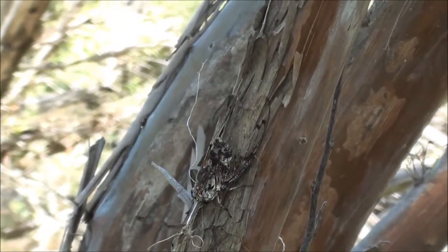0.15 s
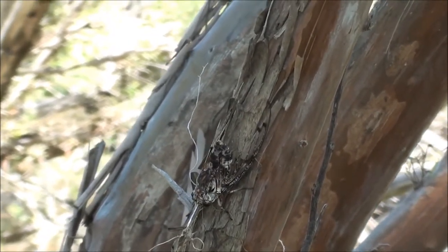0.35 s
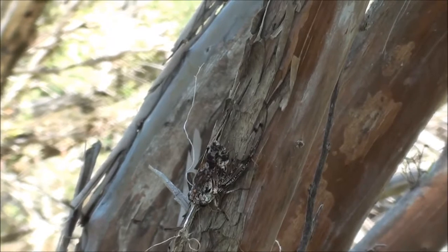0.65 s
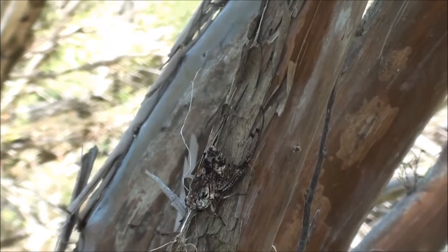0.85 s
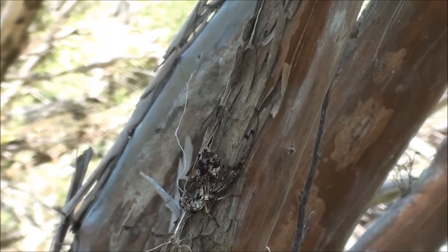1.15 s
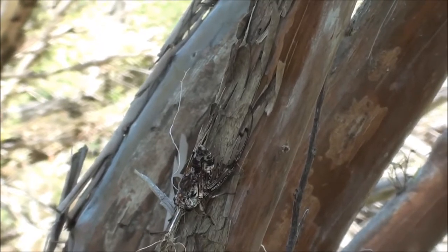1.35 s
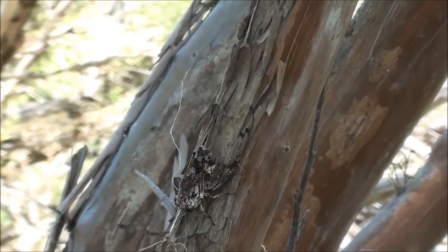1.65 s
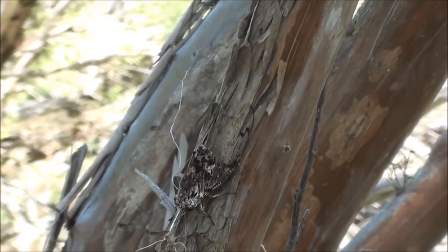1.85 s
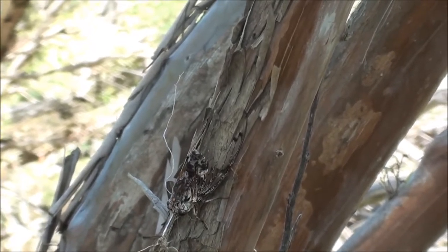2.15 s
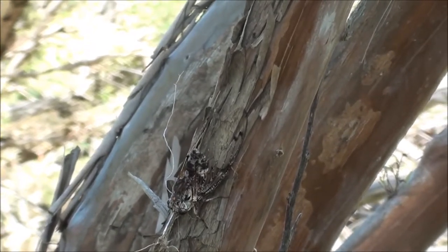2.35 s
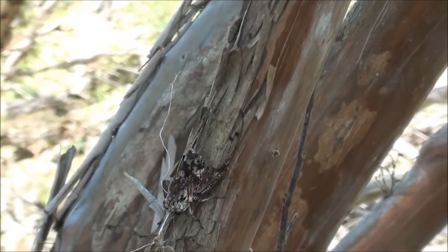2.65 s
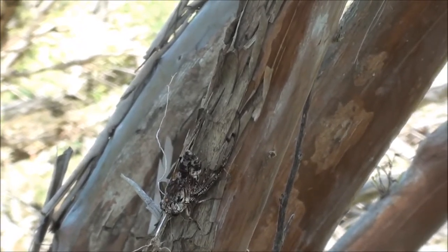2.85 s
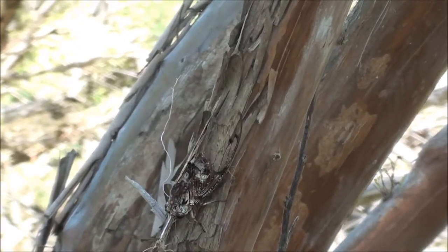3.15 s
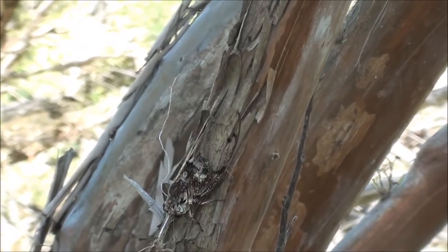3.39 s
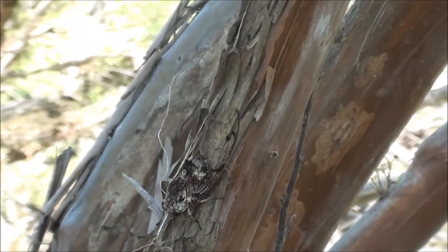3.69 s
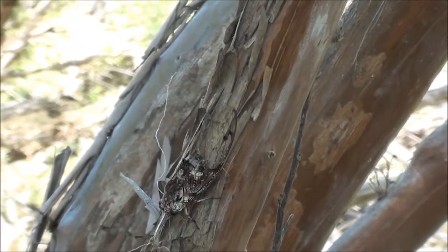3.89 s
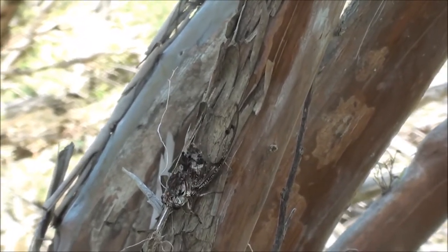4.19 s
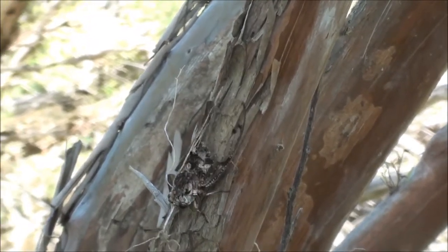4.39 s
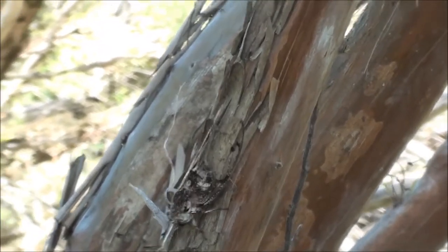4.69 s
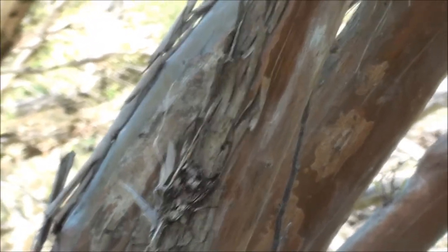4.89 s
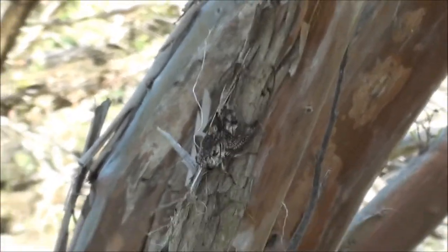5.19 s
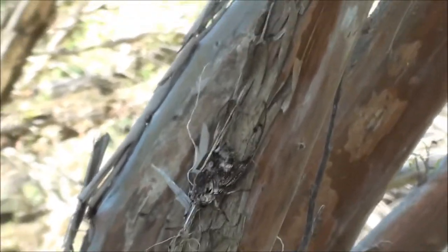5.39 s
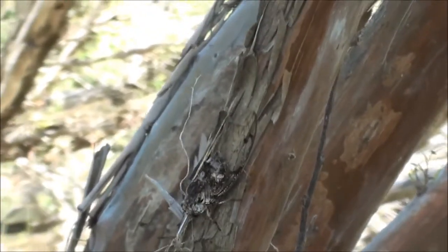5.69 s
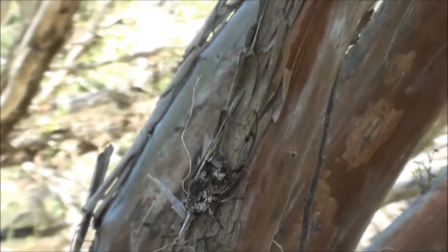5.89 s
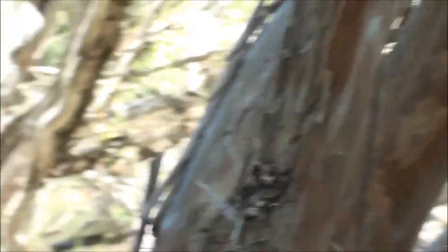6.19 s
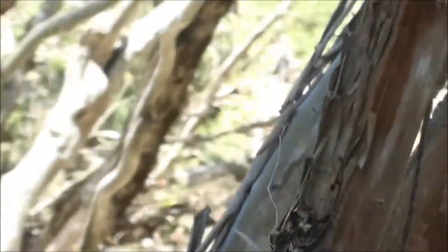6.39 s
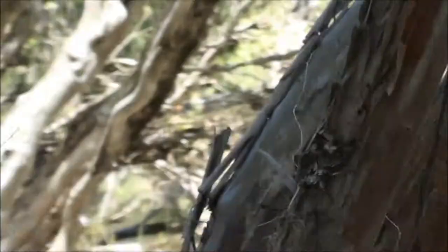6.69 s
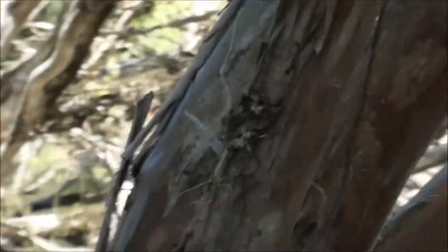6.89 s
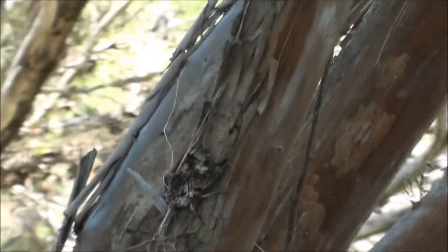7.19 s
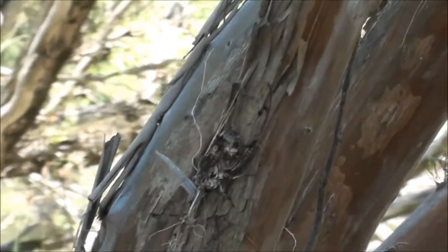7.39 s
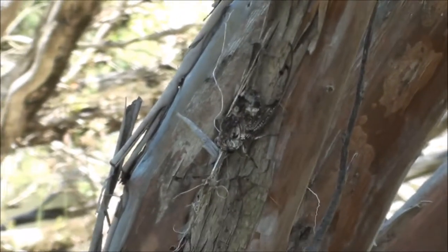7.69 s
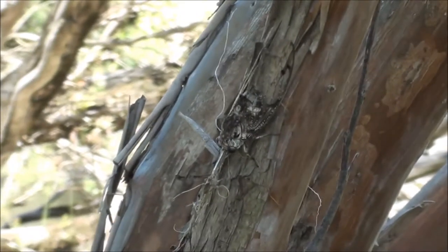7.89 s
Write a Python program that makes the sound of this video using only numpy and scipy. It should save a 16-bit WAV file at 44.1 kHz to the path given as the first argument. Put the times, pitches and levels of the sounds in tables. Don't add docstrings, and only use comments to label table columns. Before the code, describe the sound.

Loud, bright cicada song at close range: steady fast pulsing, a gap, then swelling bursts, with other cicadas, faint birds and leaves behind.

```python
import sys
import numpy as np
from scipy import signal
from scipy.fft import rfft, irfft, next_fast_len
from scipy.io import wavfile
from scipy.ndimage import uniform_filter1d, minimum_filter1d

SR = 44100
rng = np.random.default_rng(int(sys.argv[2]) if len(sys.argv) > 2 else 0)


def voltage_ratio(level):
    return 10 ** (np.asarray(level, float) / 20)


def bounce(signal):
    frames = np.transpose(np.atleast_2d(signal))
    limited = np.clip(frames, -1, 1)
    pcm = np.round(limited * 32767).astype(np.int16)
    wavfile.write(sys.argv[1], SR, pcm)


N = 355005
EARS = np.array([[1], [-1]])

# start_s, merge_s (bursts run together), end_s, first_step (of the
# ladder of strokes), level_db (of the first burst)
PHRASES = [
    (5.0126, 5.224, 5.33, 1, -13),
    (5.9562, 6.09, 6.196, 1, -12.3),
    (6.697, 6.9748, 7.0984, 0, -14.9),
    (7.5578, 7.7995, 7.9136, 0, -16),
]


def curve(table):
    return np.interp(np.arange(N) / SR, *np.transpose(table))


def band(x, lo_hz, hi_hz, order=2):
    return signal.sosfilt(signal.butter(order, [lo_hz, hi_hz], "bandpass", fs=SR, output="sos"), x)


def unit(x):
    return x / np.sqrt(np.mean(x ** 2))


def walk(rate_hz):
    hold = int(SR / rate_hz)
    steps = np.repeat(rng.standard_normal(N // hold + 1), hold)
    smooth = uniform_filter1d(uniform_filter1d(steps, hold), hold)
    return unit(smooth[:N])


def rings(s, hz, ring_s, gain, size=160):
    keep = (gain > 0) & (s > 0) & (s < (N - size - 1) / SR)
    s, hz, ring_s, gain = (v[keep][:, None] for v in (s, hz, ring_s, gain))
    at = np.ceil(s * SR).astype(int) + np.arange(size)
    age = at / SR - s
    envelope = (age / ring_s) ** 2 * np.exp(2 - 2 * age / ring_s)
    wave = gain * envelope * np.sin(2 * np.pi * hz * age)
    return np.bincount(at.ravel(), wave.ravel(), N)


def colour(x, table, pitch):
    hz, db = np.transpose(table)
    size = next_fast_len(N)
    bins_hz = np.arange(size // 2 + 1) * SR / size
    gain = voltage_ratio(np.interp(np.log(bins_hz + 1), np.log(hz * pitch), db))
    return irfft(rfft(x, size) * gain, size)[:N]


def echoes(x, t60_s, sparse=0.95):
    age = np.arange(int(.3 * SR)) / SR
    spots = rng.standard_normal((2, len(age))) * np.exp(sparse * rng.standard_normal((2, len(age))))
    tail = spots * np.exp(-np.log(1000) * age / t60_s) * (age > .003)
    tail = tail + .5 * tail[::-1]
    tail = tail / np.sqrt(np.sum(tail ** 2) / 2)
    return signal.fftconvolve(x[None], tail, axes=1)[:, :N]


def rumble():
    return voltage_ratio(-73.5) * unit(band(rng.standard_normal(N), 45, 184))


def breeze():
    # start_s, level_db
    breeze_levels = [(0, -53.5), (3.0, -54.5), (3.1, -57.5), (3.45, -56), (3.83, -53), (4.0, -52.5),
                     (4.42, -55.5), (4.55, -52.5), (5.0, -51.5), (5.6, -52.5), (5.8, -50), (6.2, -52.5),
                     (6.7, -50), (6.9, -50), (7.2, -54), (7.5, -52), (7.7, -50), (8.05, -54)]
    # pitch_hz, level_db
    leaf_spectrum = [(30, -48), (60, -47), (110, -29.5), (200, -12.5), (420, -17), (750, -12.5),
                     (1500, -15.5), (3000, -20), (5000, -20.5), (9000, -19), (12000, -29), (16000, -31)]
    out, swell = 0, walk(1.34)
    f, db = np.transpose(leaf_spectrum)
    for hz in 30 * 2 ** np.arange(0, 9.1, .5):
        grain = np.exp(0.12 * walk(60))
        mid, side = (unit(band(grain * rng.standard_normal(N), hz / 1.154, hz * 1.222)) for _ in range(2))
        level_db = np.interp(np.log(hz), np.log(f), db) + 10 * np.log10(hz)
        level_db = level_db + 0.69 * swell + 0.31 * walk(8.2)
        apart = 0.2 * min(hz / 350, 1) ** 2.1 * (1 + 0.24 * (700 < hz < 6000))
        out = out + voltage_ratio(level_db) * voltage_ratio(0.69 * EARS) * (mid + apart * side * EARS)
    return voltage_ratio(curve(breeze_levels)) * out / np.std(band(out[0], 176, 960, order=4))


def grip():
    # start_s, level_db (peak), pitch_hz, treble_db
    grip_ticks = [
        (4.777, -35, 1080, -37),
        (4.867, -42, 770, -41),
        (5.016, -35, 696, -33),
        (5.761, -40, 315, -23.5),
        (5.779, -37, 852, -30),
        (6.044, -32, 405, -35),
        (6.654, -33, 523, -49),
        (6.699, -36, 600, -50),
        (6.809, -39, 682, -35),
        (6.898, -33, 566, -33),
    ]
    out = np.zeros(N)
    age = np.arange(int(.02 * SR)) / SR
    for s, db, hz, treble_db in grip_ticks:
        noise = rng.standard_normal((2, len(age)))
        thud = np.sin(2 * np.pi * hz * age) + 2.3 * band(noise[0], 300, 1200)
        ring = voltage_ratio(db) * thud * np.exp(-age / 0.0034)
        scratch = voltage_ratio(treble_db) * band(noise[1], 1800, 9000) * np.exp(-age / 0.007)
        start = int(s * SR)
        out[start:start + len(age)] += band(ring, 200, 5000) + scratch
    return out


def birds():
    # start_s, length_ms, from_hz, to_hz, level_db
    song_notes = [(0.006, 24, 3040, 2630, -51.5), (0.108, 35, 4400, 3200, -50.5),
                  (0.255, 48, 2220, 2600, -58), (0.383, 22, 4620, 2840, -49.5),
                  (0.527, 34, 2400, 2510, -59), (0.646, 43, 3120, 2280, -54), (0.791, 50, 3030, 2350, -56),
                  (0.945, 34, 3480, 2580, -58), (0.98, 20, 2380, 2270, -60), (1.105, 22, 3500, 2530, -54),
                  (1.135, 29, 2230, 1880, -61)]
    # before_s (ahead of the last note), length_ms, from_hz, to_hz, level_db
    trill_notes = [
        (0, 12, 2660, 2630, -2.5),
        (0.0226, 10, 2660, 2720, -5.5),
        (0.047, 12, 2650, 2760, -8),
        (.072, 7.3, 2340, 2525, 1),
    ]
    # last_note_s, notes (count), level_db
    trill_times = [(4.70, 4, -50), (4.932, 4, -50.5), (5.138, 2, -53), (5.364, 3, -54), (7.284, 3, -50.5),
                   (7.53, 4, -53), (7.757, 3, -52), (8.01, 3, -51)]
    notes = list(song_notes)
    for s, count, db in trill_times:
        for before_s, ms, from_hz, to_hz, relative_db in trill_notes[:round(count)]:
            notes.append((s - before_s, ms, from_hz, to_hz, db + relative_db))
    out = np.zeros(N)
    for s, ms, from_hz, to_hz, db in notes:
        u = np.arange(int(ms * SR / 1000)) / (ms * SR / 1000)
        hz = from_hz + (to_hz - from_hz) * (1 - np.exp(-1.6 * u)) / (1 - np.exp(-1.6))
        envelope = np.sqrt(np.sin(np.pi * u)) * np.exp(-1.0 * u)
        i = int(s * SR)
        out[i:i + len(u)] += voltage_ratio(db + 12.5) * envelope * np.sin(2 * np.pi * np.cumsum(hz) / SR)
    return voltage_ratio(1.0 * EARS) * out + voltage_ratio(-4) * echoes(out, 0.26, sparse=1.0)


def chorus_db():
    # start_s, level_db
    chorus_levels = [(0, -30), (3.0, -32.5), (3.1, -25.5), (3.9, -24.5), (4.05, -21), (4.3, -29.5),
                     (4.5, -26.5), (4.95, -24), (5.3, -28), (5.4, -30), (5.75, -28.5), (5.92, -24.5),
                     (6.2, -36.5), (6.65, -32.5), (7.12, -38), (7.3, -30.5), (7.5, -32.5), (8.05, -36.5)]
    under_db, top_db = -13, -20.5
    levels = [curve(chorus_levels)]
    for s, merge, end, step, db in PHRASES:
        levels.append(curve([(s - .03, -70), (s, db + under_db), (merge - .06, top_db),
                             (merge + 0.065, top_db), (end - .02, -70)]))
    return np.max(levels, axis=0)


def chorus():
    # start_s, level_db
    neighbour_share = [(0, -12), (3.5, -12), (3.75, -4), (4.5, -5), (4.65, -1), (5.1, -1), (5.4, -12),
                       (7.1, -10), (7.2, -4), (7.35, -10), (8.05, -9)]
    start_s, period_s, burst_ms = 0.052, 0.037, 27
    starts = np.arange(start_s, N / SR, period_s)
    near = unit(cicada([(s, burst_ms, -10) for s in starts], pitch=1.0, snap_db=-28))
    near = voltage_ratio(1.2 * EARS) * near + voltage_ratio(-1.5) * echoes(near, 0.044)
    far = 0
    for far_period_s, pitch in [(.036, 1.14), (.039, 0.908), (.0415, 1.05)]:
        one = unit(cicada([(s, 31, -10) for s in np.arange(.01, N / SR, far_period_s)], pitch=pitch))
        drift = voltage_ratio(-6 + 0.18 * walk(7.04))
        far = far + drift * (voltage_ratio(-11) * one + echoes(one, 0.17, sparse=1.0))
    far = band(far, 4170, 9000, order=2)
    share = np.clip(voltage_ratio(curve(neighbour_share)), 0, .98)
    return voltage_ratio(chorus_db()) * (share * near + np.sqrt(1 - share ** 2) * unit(far))


def rival():
    # start_s, level_db
    rival_levels = [
        (0, -61),
        (3.15, -80),
        (3.25, -28.5),
        (3.36, -20),
        (3.43, -22),
        (3.48, -34),
        (3.5, -70),
        (8.05, -70),
    ]
    x = unit(cicada([(3.1, 426, -10)], pitch=0.98, snap_db=-26)) * 0.17
    return voltage_ratio(curve(rival_levels)) * (voltage_ratio(.8 * EARS) * x + voltage_ratio(-3.5) * echoes(x, 0.032, sparse=0.93))


def duck(bursts):
    depth_db, window_s = -5.5, 0.05
    from_share, over_share = 0.527, 0.061
    busy = np.zeros(N)
    for s, ms, db in bursts:
        busy[max(int(s * SR), 0):int((s + ms / 1000) * SR)] = 1
    size = int(window_s * SR)
    filled = uniform_filter1d(uniform_filter1d(busy, size), size)
    return depth_db * uniform_filter1d(np.clip((filled - from_share) / over_share, 0, 1), size)


def cicada(bursts, pitch=0.97, snap_db=-36):
    # pitch_hz, level_db
    abdomen_response = [(3500, -4.5), (4500, -2), (5300, -10.5), (5800, -7), (6300, -8), (7200, 2),
                        (8000, 1.5), (8700, 4.5), (9600, 1), (10800, -3.5), (12500, 1.5), (13300, -2),
                        (14300, 0.5), (15400, 16)]
    stroke_ms, rib_gap_ms, weak_db = 6.4, .79, -11.6
    first_rib_hz, rib_fall_hz = 9295, 296.3
    rows = []
    for s, ms, db in bursts:
        count = max(round(ms / stroke_ms), 1)
        span_s = ms / count / 1000
        for k in range(count):
            jitter_s = 0.000247 * rng.standard_normal() * (k > 0)
            rows.append((s + k * span_s + jitter_s, span_s, db, k == 0 and count > 1))
    s, span, db, first = (c[:, None] for c in np.transpose(rows))
    rib = np.arange(9)
    late, detune, size, snap = rng.standard_normal((len(rows), 4, 9)).transpose(1, 0, 2)
    slow = 1 + .5 * np.clip(weak_db - db, 0, 1.4)
    hesitate = .0003 * first * (rib > 0)
    since = rib * slow * rib_gap_ms / 1000 + hesitate + .00005 * np.cumsum(late, axis=1)
    pops = since < span - .0002
    hz = first_rib_hz - rib_fall_hz * rib * slow - 500 * (slow - 1)
    hz = pitch * (hz + 130 * detune + 150 * detune[:, :1])
    rib_db = db + 8.5 + 0.033 * (rib - 21) - 0.2 * first * (13.0 - rib) + 1.78 * size
    rib_db = rib_db - 15 * (slow - 1) * (rib == 0) * (1.5 - first)
    gain = voltage_ratio(rib_db) * np.sqrt(slow) * pops
    ring_s = (.00013 + .0000022 * rib ** 2) * slow ** .5
    s, hz, ring_s, gain = (v.ravel() for v in (s + since, hz, ring_s, gain))
    drum = band(rings(s, hz, ring_s, gain), 5700 * pitch, 10400 * pitch, order=3)
    snaps = rings(s, 12400 + 400 * snap.ravel(), 1.6 * ring_s, gain)
    return colour(drum + voltage_ratio(snap_db) * snaps, abdomen_response, pitch)


def song_plan():
    # start_s, burst_number
    buzz_beat = [(-.0222, -1), (.321, 8), (.4708, 12), (.7009, 18), (.8892, 23), (1.1563, 30), (1.3491, 35),
                 (1.5389, 40), (2.1133, 55), (2.5714, 67), (2.7966, 73), (2.9498, 77), (3.0285, 79),
                 (4.0481, 80), (4.1495, 83), (4.2575, 86), (4.3727, 89), (4.415, 90)]
    stroke_runs = [(0, 6, 5), (8, 9, 3.4), (13, 15, 5), (17, 17, 5), (23, 27, 5), (33, 33, 5), (37, 43, 5),
                   (47, 47, 5), (49, 49, 5), (52, 55, 5), (63, 65, 5), (74, 75, 5), (79, 79, 3.4),
                   (80, 81, 2), (82, 82, 3), (89, 89, 3), (90, 90, 1)]
    stroke_ladder = [1, 2, 2, 3, 3, 3, 3, 4]
    phrase_beat_s, lone_late_s, merge_early_s, swell_db = .035, .0055, .003, 1.05
    last_strokes_s, merged_stop_s = (.04, .03, .0195, .007), .0432
    full_db, scatter_db, scatter_s = -10, .3, .0005

    def length_ms(strokes):
        return 6.6 * strokes - .7

    number = np.arange(buzz_beat[0][1], buzz_beat[-1][1] + 1)
    strokes = np.full(len(number), 4.)
    for first, last, count in stroke_runs:
        strokes[(number >= first) & (number <= last)] = count
    starts = np.interp(number, *np.transpose(buzz_beat)[::-1])
    rows = list(zip(starts, length_ms(strokes), full_db + 0 * strokes))
    for start, merge, end, step, db in PHRASES:
        beats = round((merge - start) / phrase_beat_s)
        beat_s = (merge + merge_early_s - start) / beats
        for k, count in enumerate(stroke_ladder[step:step + beats]):
            s = start + k * beat_s + lone_late_s * (count == 1)
            rows.append((s, length_ms(count), min(db + swell_db * k, full_db)))
        rows.append((merge, 1000 * (end - merged_stop_s - merge), full_db))
        rows += [(end - before, length_ms(1) + .5, full_db) for before in last_strokes_s]
    return np.array(rows) + rng.standard_normal((len(rows), 3)) * [scatter_s, 0, scatter_db]


def singer(bursts):
    x = cicada(bursts)
    trunk = voltage_ratio(-17) * echoes(x, .02, sparse=1.2)
    grove = voltage_ratio(-17) * echoes(x, 0.17, sparse=0.87)
    direct = x + 0.067 * EARS * np.gradient(x)
    return voltage_ratio(-.3 * EARS) * direct + trunk + grove


def scene():
    bursts = song_plan()
    background = rumble() + voltage_ratio(duck(bursts)) * breeze() + grip() + birds()
    return background + chorus() + rival() + singer(bursts)


def roll_off(x):
    return signal.sosfilt(signal.butter(12, 16310, fs=SR, output="sos"), x)


def record(dry):
    rib_rate = band(dry ** 2, 1110, 2650) * voltage_ratio(-35.5)
    overtone = band(dry ** 2, 18300, 20000, order=3) * voltage_ratio(-24)
    bend = rib_rate + overtone
    crest = -minimum_filter1d(-np.abs(dry).max(axis=0), size=31)
    gain = uniform_filter1d(np.minimum(.86 / (crest + 1e-9), 1), size=25)
    top_cut = signal.ellip(14, .2, 80, 15760, fs=SR, output="sos")
    return roll_off(signal.sosfilt(top_cut, gain * dry + bend))


dry = scene()
out = record(dry)
bounce(out)
```